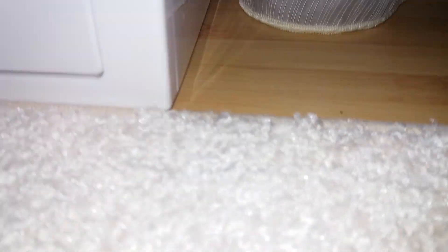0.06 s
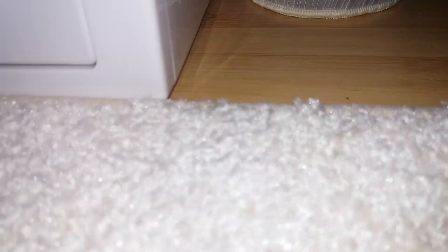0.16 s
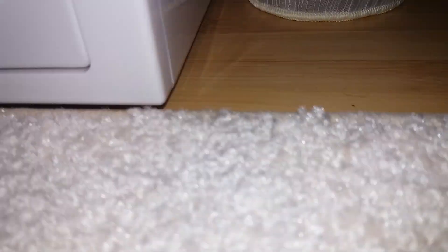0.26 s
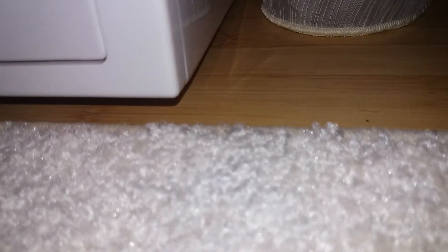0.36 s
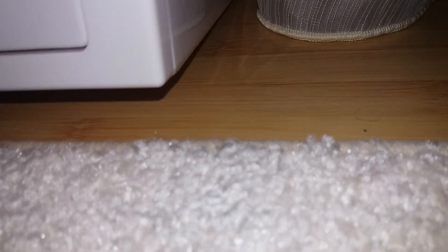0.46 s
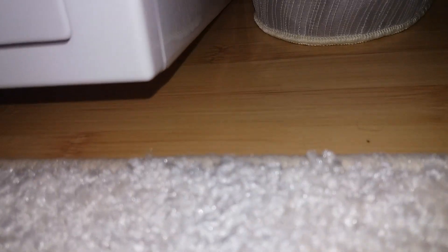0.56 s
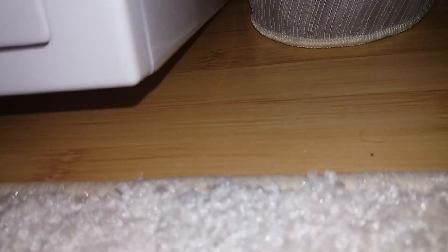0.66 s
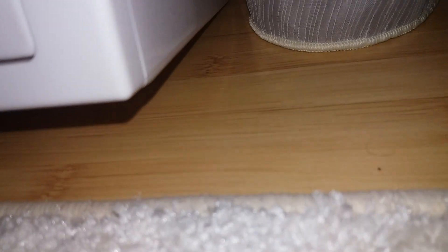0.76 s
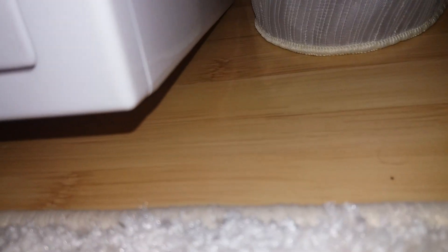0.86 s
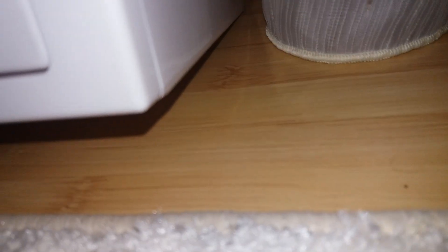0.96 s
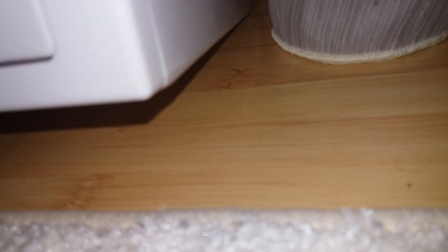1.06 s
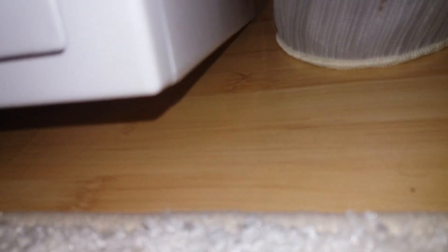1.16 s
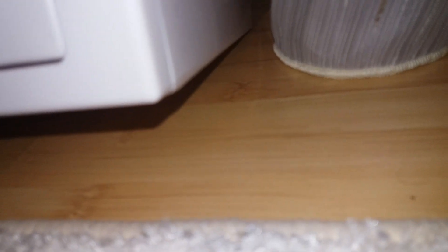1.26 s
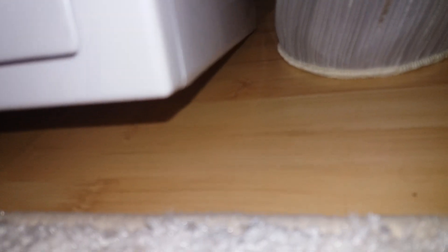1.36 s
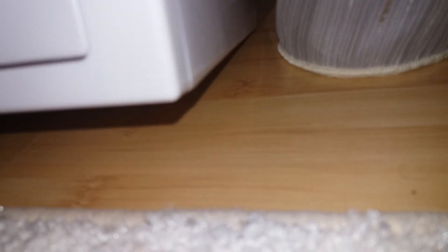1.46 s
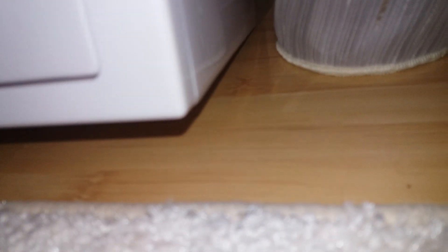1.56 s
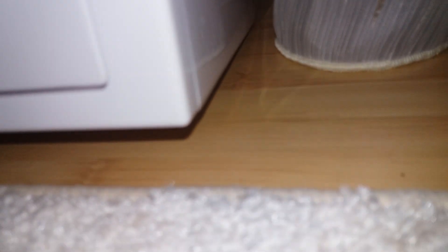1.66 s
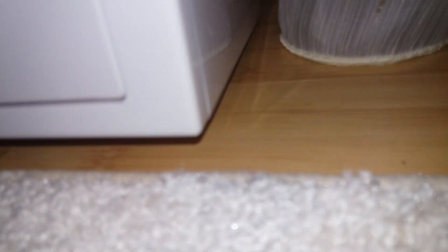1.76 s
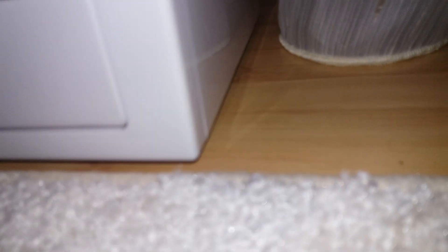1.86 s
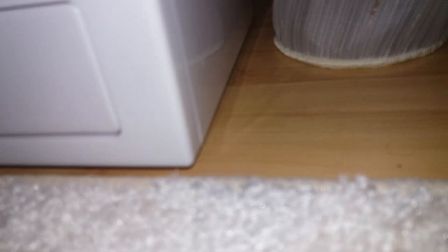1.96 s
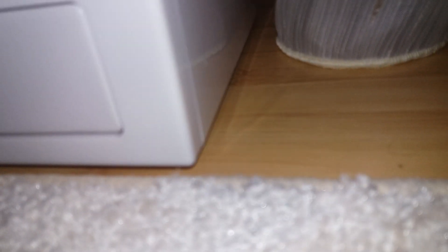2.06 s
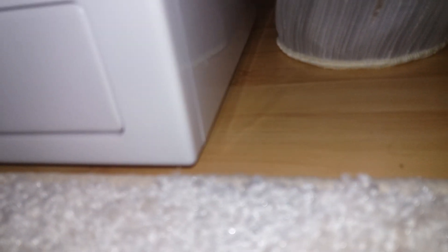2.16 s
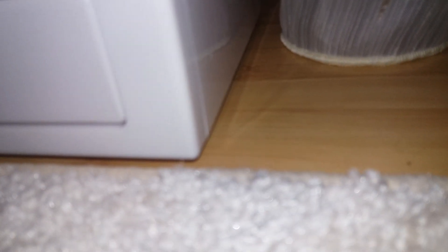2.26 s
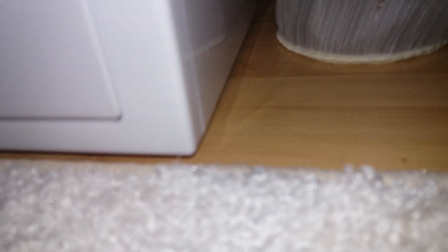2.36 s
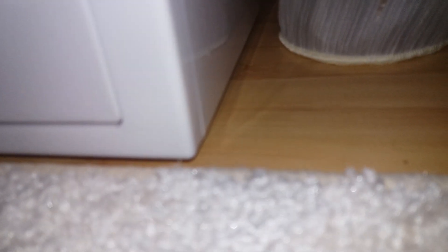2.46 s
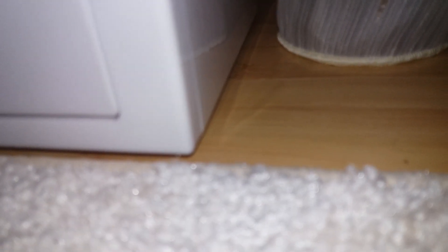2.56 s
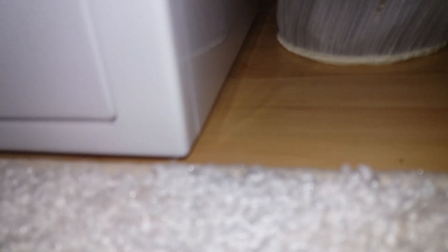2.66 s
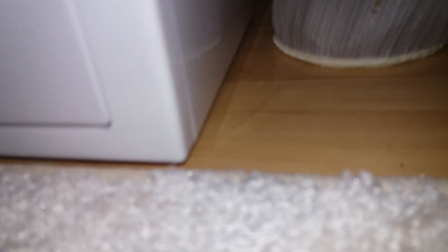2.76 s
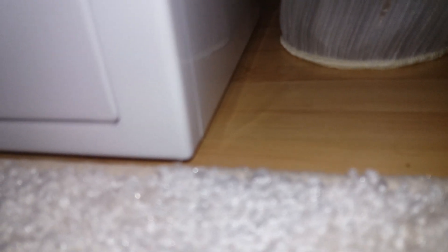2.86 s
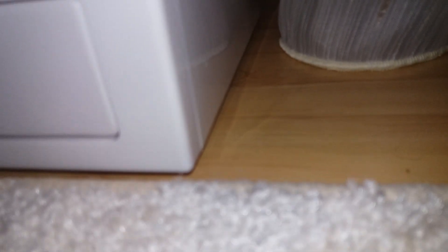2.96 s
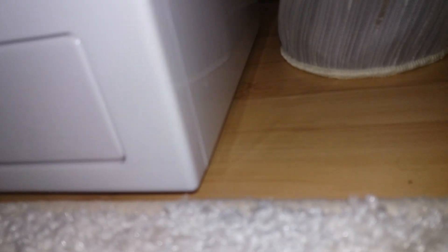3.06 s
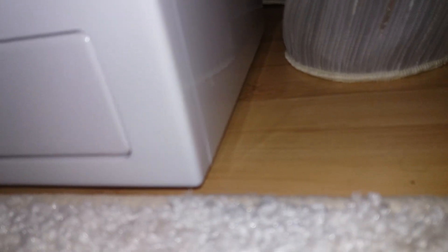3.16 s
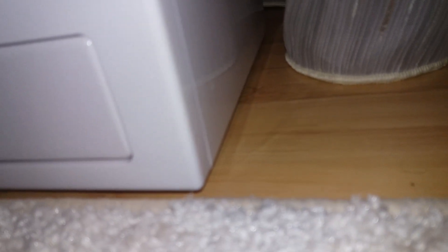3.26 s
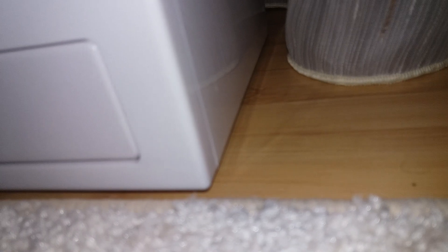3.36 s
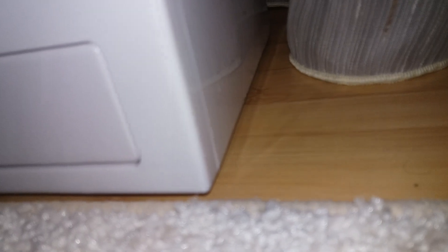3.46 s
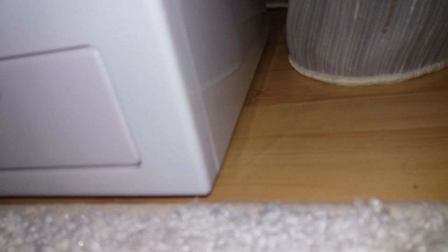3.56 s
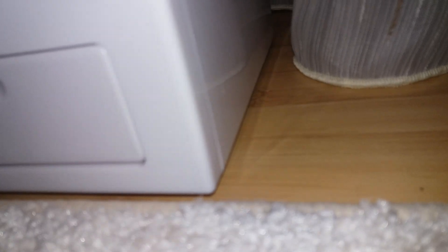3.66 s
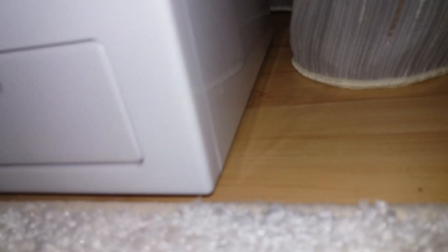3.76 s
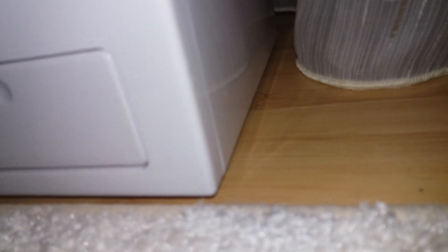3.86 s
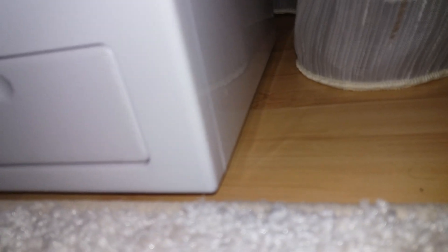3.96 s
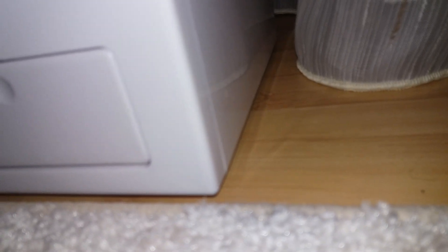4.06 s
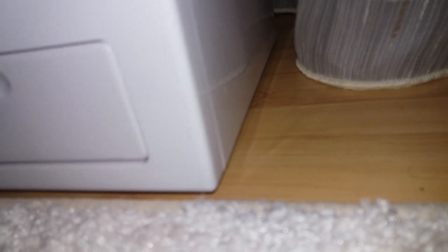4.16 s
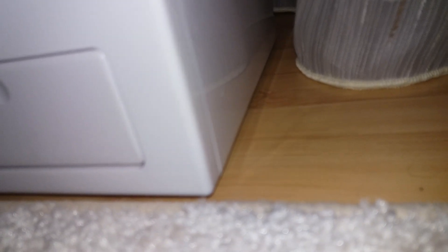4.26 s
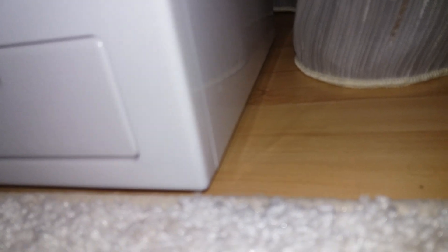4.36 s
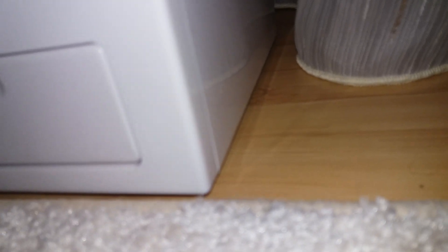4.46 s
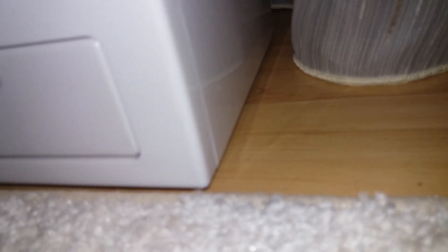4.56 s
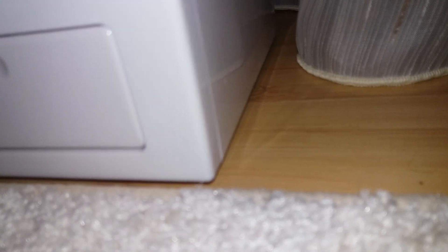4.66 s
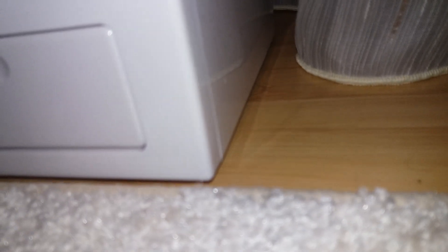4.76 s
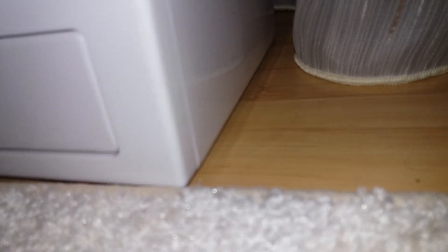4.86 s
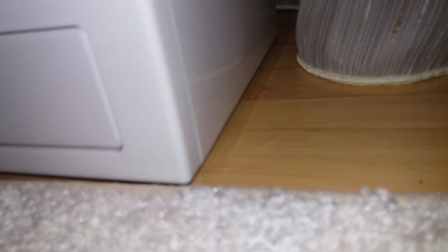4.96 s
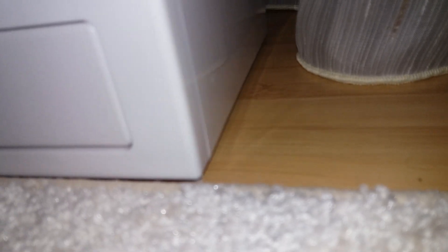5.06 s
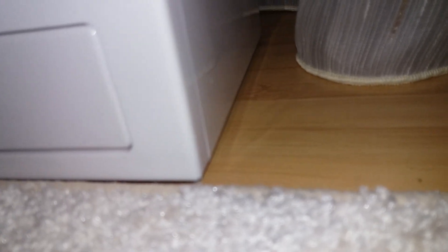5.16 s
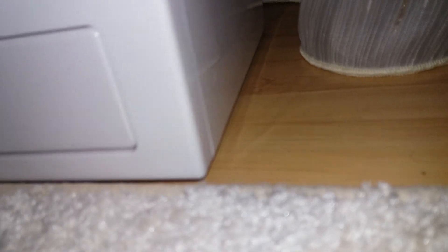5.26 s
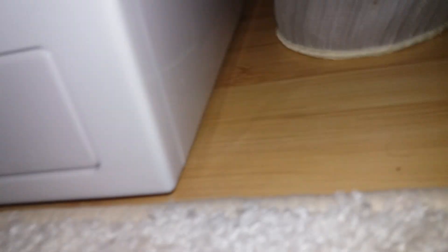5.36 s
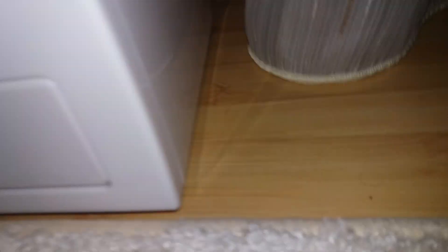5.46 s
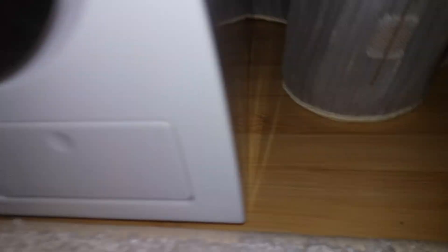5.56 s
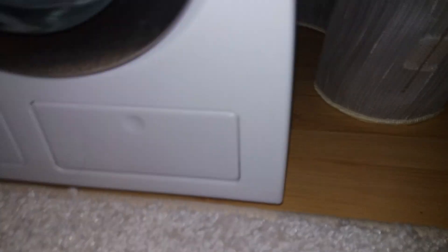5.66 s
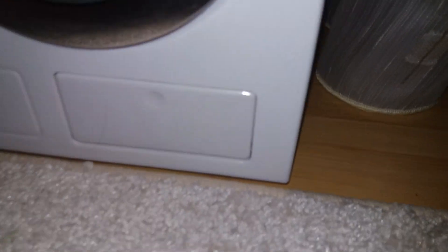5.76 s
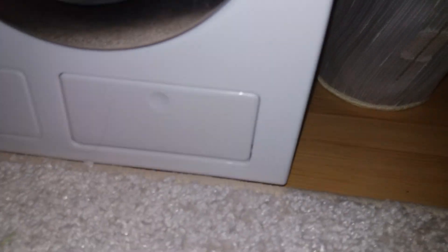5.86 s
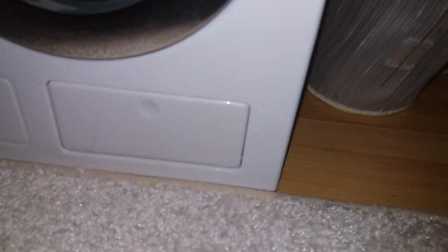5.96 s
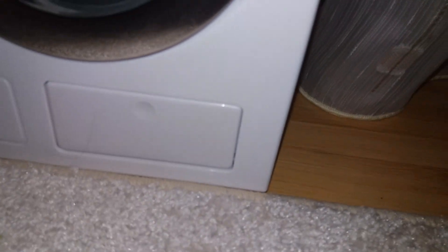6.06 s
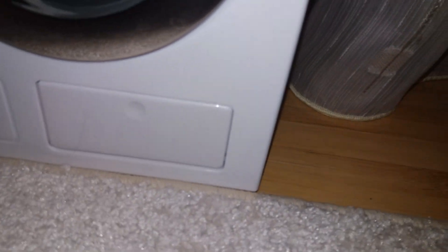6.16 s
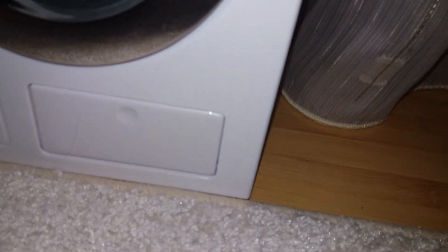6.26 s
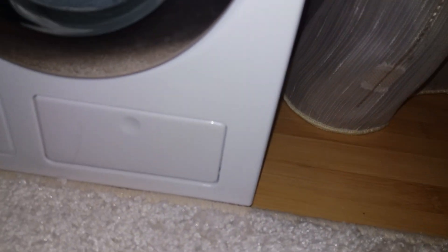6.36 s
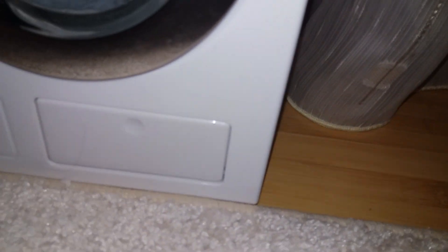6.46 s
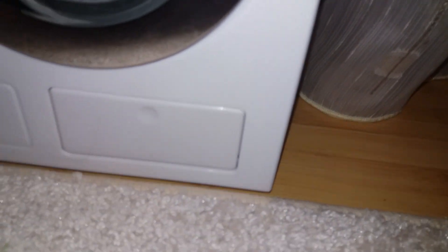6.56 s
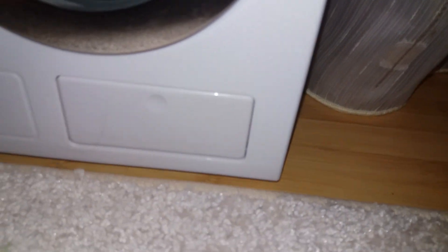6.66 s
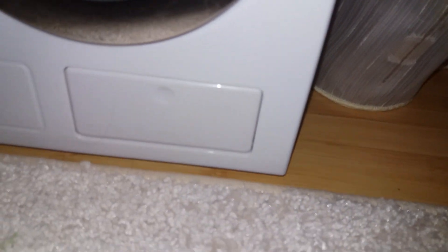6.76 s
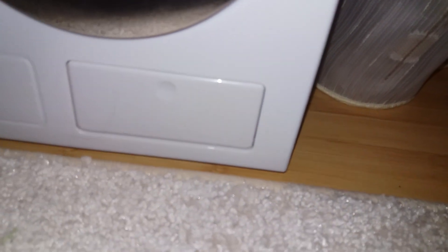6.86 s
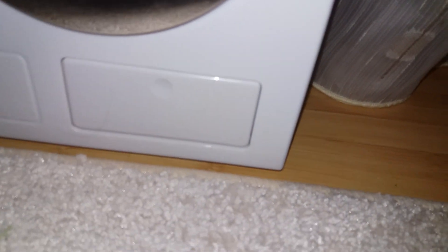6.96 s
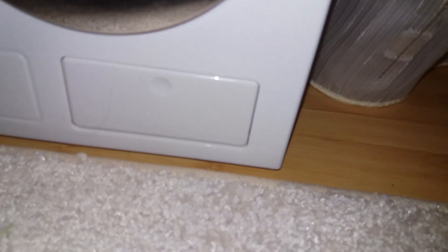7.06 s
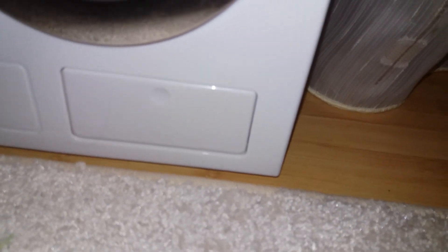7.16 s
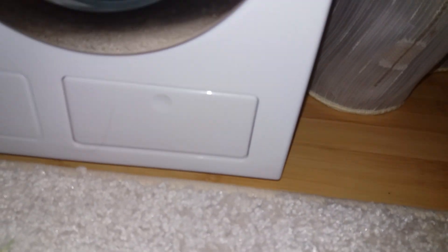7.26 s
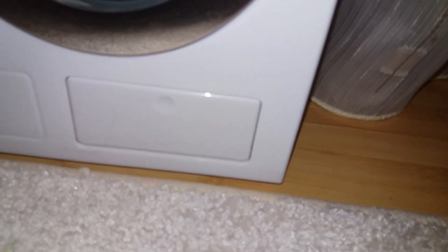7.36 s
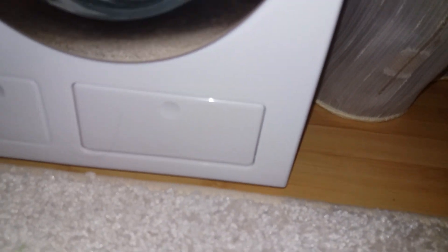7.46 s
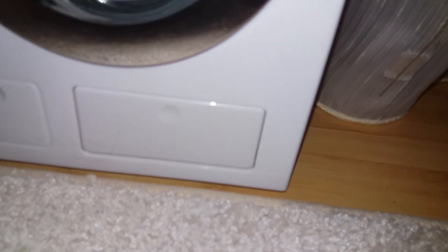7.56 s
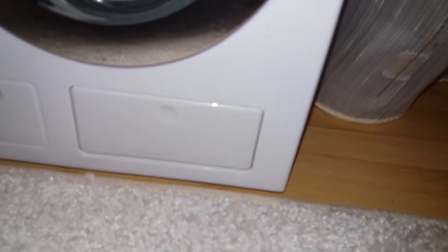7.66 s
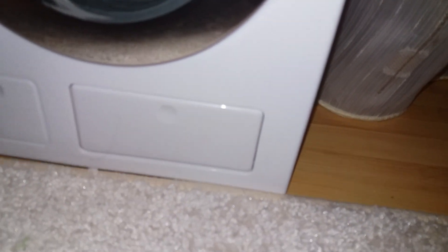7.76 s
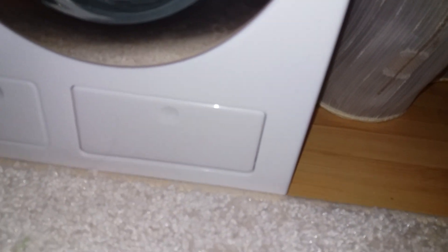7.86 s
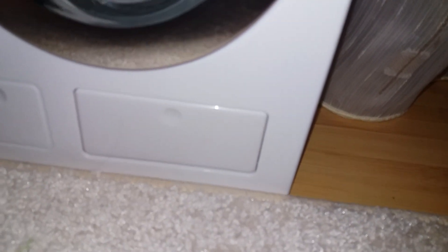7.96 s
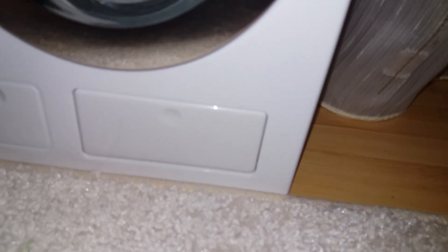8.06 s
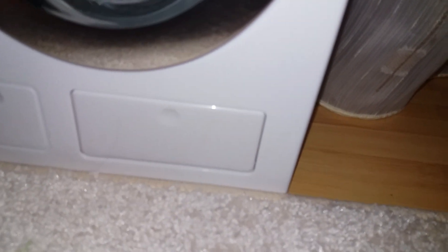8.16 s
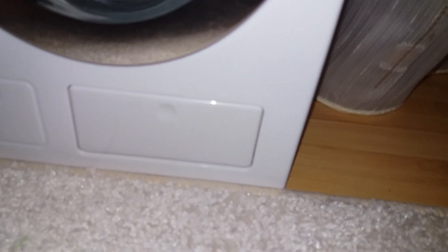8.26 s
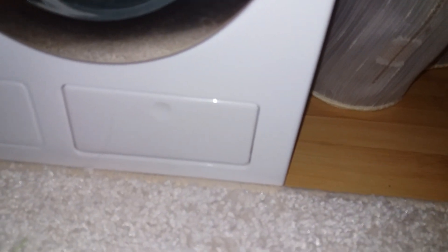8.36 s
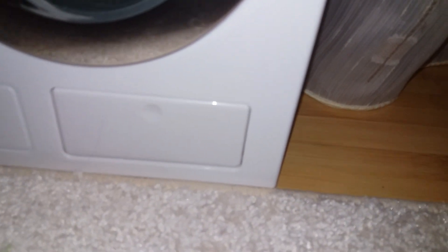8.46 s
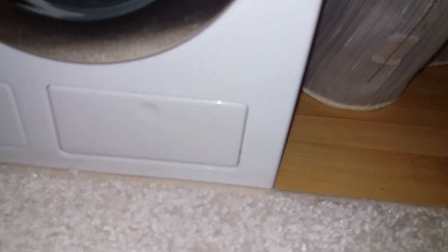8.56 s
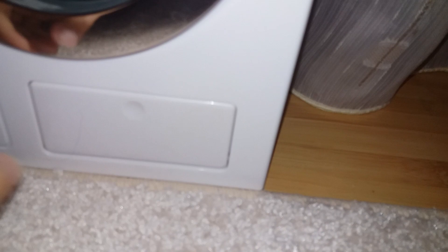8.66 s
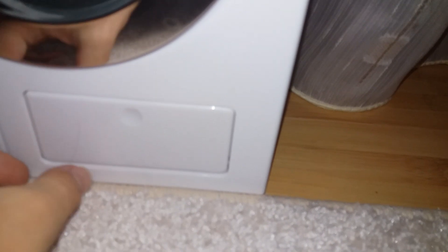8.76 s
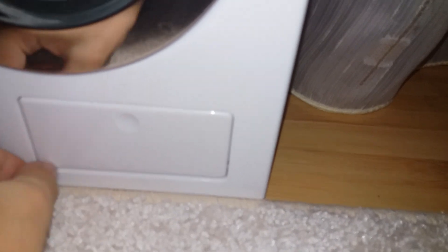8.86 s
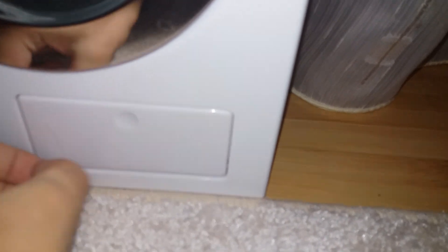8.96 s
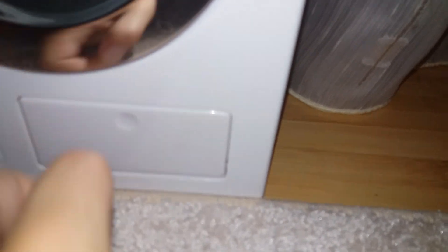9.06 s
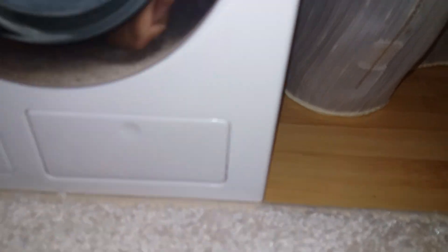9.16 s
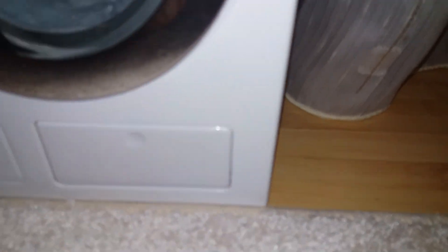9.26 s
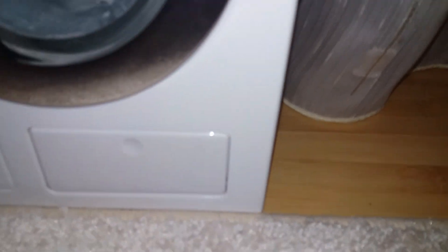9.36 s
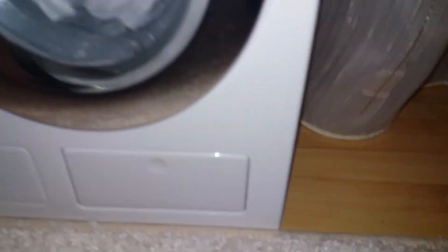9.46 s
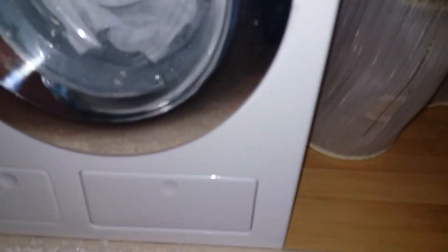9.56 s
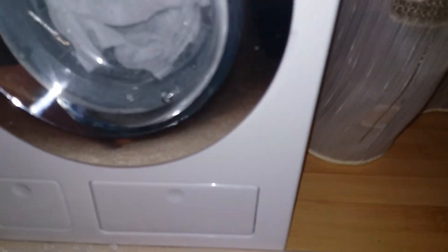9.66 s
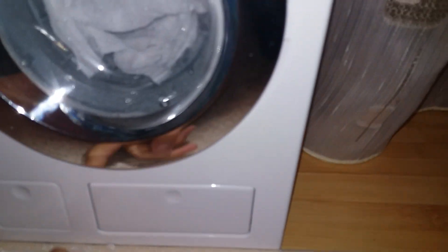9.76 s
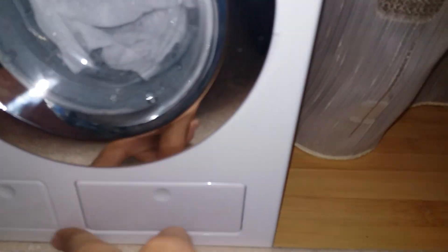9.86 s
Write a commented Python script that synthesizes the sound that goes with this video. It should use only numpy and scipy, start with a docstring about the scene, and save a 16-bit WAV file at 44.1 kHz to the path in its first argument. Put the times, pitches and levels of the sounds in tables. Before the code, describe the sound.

A hollow plastic toy washing machine knocks, clicks and scuffs on a wooden floor, with soft thuds in a quiet room.

```python
"""A plastic toy washing machine is tipped, set down and nudged on a wooden floor in a small quiet room.
Blows ring the modes of its hollow case, loose parts click, and shifting weight thuds in the floor.
The base scuffs in tiny slips that rasp and drum the panels. The boards groan, cloth brushes over
carpet, and a faint low hum wavers under dull room noise."""
import sys
import numpy as np
from scipy import signal
from scipy.fft import rfft, irfft, next_fast_len
from scipy.io import wavfile
from scipy.ndimage import uniform_filter1d

SR = 44100
rng = np.random.default_rng(int(sys.argv[2]) if len(sys.argv) > 2 else 0)


def persist_wave(psi):
    """Save psi, clipped to +-1, as 16-bit WAV."""
    counts = np.round(np.clip(psi, -1, 1) * 32767).astype(np.int16)
    wavfile.write(sys.argv[1], SR, np.atleast_2d(counts).T)


N = 437031
TIME_S = np.arange(N) / SR
AGE_S = TIME_S[:SR * 2 // 5]   # time since a blow

# case modes: (frequency [Hz], level [dB], t60 [s])
CASE_MODES = [(139, -18, 0.094), (195, -3, 0.0958), (225.5, 2.5, 0.13), (239.2, -10, 0.13),
              (352, -10.5, 0.046), (432, -4, 0.065), (506.7, -12.5, 0.076), (574, -14, 0.14),
              (643, -12, 0.053), (852.4, -7, 0.077), (934, -4.5, 0.038), (1084, -11, 0.11),
              (1313, -10.5, 0.055), (1594, -5.5, 0.045), (1724, -3, 0.016), (1868, -4, 0.043),
              (2154, 5, 0.012), (2495, -4.5, 0.039), (2663, -14.5, 0.069), (2902, -8, 0.017),
              (3210, -15.5, 0.018), (3520, -18.5, .025), (3760, -19.5, 0.031), (4280, -15, 0.022)]
# boom, body, clack and tick bands: (low [Hz], high [Hz])
BANDS_HZ = [(110, 300), (300, 1200), (1200, 3500), (3500, 13000)]


def amp(db):
    """Decibels to gain."""
    return 10 ** (np.asarray(db) / 20)


def unit_rms(x):
    """Scale to rms 1."""
    return x / np.sqrt(np.mean(x ** 2) + 1e-20)


def at_hz(points, hz):
    """Interpolate a table over log frequency."""
    known_hz, value = np.transpose(points)
    return np.interp(np.log(np.maximum(hz, 1)), np.log(known_hz), value)


def coloured(x, spectrum):
    """Shape by (frequency [Hz], gain [dB]); rms 1."""
    size = next_fast_len(len(x))
    gain = amp(at_hz(spectrum, np.fft.rfftfreq(size, 1 / SR)))
    return unit_rms(irfft(rfft(x, size) * gain, size)[:len(x)])


def band(x, low_hz, high_hz, order=2):
    """Causal band-pass."""
    sos = signal.butter(order, [low_hz, high_hz], "band", fs=SR, output="sos")
    return signal.sosfilt(sos, x + 1e-18)


def low_pass(x, hz, order=2):
    """Causal low-pass."""
    return signal.sosfilt(signal.butter(order, min(hz, SR * 0.45), fs=SR, output="sos"), x)


def resonate(x, hz, width_hz):
    """One resonance, unit peak gain."""
    r = np.exp(-np.pi * width_hz / SR)
    feedback = [1, -2 * r * np.cos(2 * np.pi * hz / SR), r * r]
    return signal.lfilter(np.array([1, 0, -1]) * (1 - r * r) / 2, feedback, x)


def decay(t60_s):
    """Envelope falling 60 dB in t60_s."""
    return np.exp(-np.log(1000) * AGE_S / t60_s)


def add(out, time_s, sound):
    """Mix a sound in at time_s."""
    start = max(round(time_s * SR), 0)
    out[start:start + len(sound)] += sound[:max(len(out) - start, 0)]


def strokes(rows, edge_db=-16):
    """Envelope of strokes that swell and fade, linear in dB."""
    gain = 0
    for peak_s, length_s, db in rows:
        away = np.abs(TIME_S - peak_s) / (length_s / 2)
        gain = np.maximum(gain, amp(db + edge_db * np.minimum(away, 10)))
    return gain


def air(room_db=-65, hiss_db=-87):
    """Dull room noise and even microphone hiss."""
    # still air: (frequency [Hz], gain [dB])
    spectrum = [(25, -31.5), (50, -7.5), (85, -3.5), (120, -5.5), (165, -1), (280, -8.5), (450, -11),
                (700, -14), (1200, -20), (2400, -23), (3500, -27), (5500, -34.5), (9000, -37.5),
                (15500, -36)]
    room_noise = coloured(rng.standard_normal(N), spectrum)
    return amp(room_db) * room_noise + amp(hiss_db) * rng.standard_normal(N)


def hum_and_groans(hz=89.5, width_hz=39):
    """A wavering narrow-band hum; the boards groan in the same band as weight shifts."""
    # hum: (time [s], level [dB])
    hum_levels = [(0, -67), (1, -87), (2.6, -74.5), (3.8, -70.5), (6, -72), (7, -80), (8.1, -71.5),
                  (8.7, -85), (9.9, -78)]
    # board groans: (peak time [s], length [s], level [dB])
    groans = [(1.35, 0.23, -46.5), (1.55, 0.34, -51), (1.85, 0.61, -60), (6.49, 0.3, -55)]
    noise = rng.standard_normal(N + SR)
    drone = resonate(resonate(noise, hz, width_hz), hz, width_hz)[SR:]
    drone /= np.sqrt(uniform_filter1d(drone ** 2, size=SR // 8) + 1e-20)
    hum_gain = amp(np.interp(TIME_S, *np.transpose(hum_levels)))
    return np.hypot(hum_gain, strokes(groans)) * drone


def cloth():
    """Cloth on carpet: fibre contacts merge into a soft hiss."""
    # brush strokes: (peak time [s], length [s], level [dB])
    brushes = [(0.05, 0.32, -65.5), (0.18, 0.58, -65.5), (0.87, 1, -64), (5.53, 0.75, -71.5), (5.8, 1, -69)]
    # fibre hiss: (frequency [Hz], gain [dB])
    spectrum = [(500, -18.5), (1500, 12.5), (3000, 10), (5500, -5.5), (7000, -7), (9000, -20),
                (15000, -25.5)]
    return strokes(brushes) * coloured(rng.standard_normal(N), spectrum)


def floor_thuds(push_t60_s=0.065, rise_s=0.0036, trim_db=4, boards_db=-19, boards_t60_s=0.53):
    """Weight shifts on the floor: a push of a few cycles, then the boards rumble on."""
    # thuds: (time [s], relative level [dB], pitch [Hz])
    thuds = [(1.212, -26, 137), (1.25, -38.5, 104), (1.999, -32, 61.1), (3.185, -44, 147), (3.509, -46, 90),
             (3.589, -42, 80), (5.212, -42.5, 70), (6.012, -39.5, 72), (6.143, -44, 79.4),
             (6.401, -43, 103), (6.556, -31.5, 161), (7.896, -42, 146), (8.362, -40, 85)]
    out = np.zeros(N)
    attack = 1 - np.exp(-AGE_S / rise_s)
    for time_s, db, hz in thuds:
        rumble = unit_rms(band(rng.standard_normal(len(AGE_S)), hz * 0.88, hz * 1.63))
        boards = amp(boards_db) * rumble * decay(boards_t60_s)
        push = np.sin(2 * np.pi * hz * AGE_S) * decay(push_t60_s)
        add(out, time_s, amp(db + trim_db) * (push + boards) * attack)
    return band(out, 55, 1500, order=3)


def base_scuffs(slips_per_s=3000, uneven_db=2.5, ring_db=-1, drum_trim_db=-2, rasp_trim_db=-1.5):
    """Dense tiny slips rasp under the base and set the panels drumming."""
    # pushes: (peak time [s], length [s], relative drumming [dB], relative rasp [dB])
    pushes = [(1.826, 0.67, -66, -60.5), (1.977, 0.1, -47.5, -58.5), (3.24, 0.22, -42.5, -59.5),
              (3.423, 0.031, -34.5, -71), (3.493, 0.14, -37, -55.5), (3.667, 0.61, -53.5, -69),
              (3.866, 0.22, -65, -67), (4.004, 0.088, -56, -80), (4.355, 0.23, -49.5, -76),
              (4.978, 0.19, -46.5, -58), (5.175, 0.13, -42, -52), (5.47, 0.071, -57.5, -52),
              (6.039, 0.31, -54, -73), (6.244, 0.32, -65, -65), (6.323, 0.091, -63, -58),
              (6.373, 0.43, -54, -62), (6.592, 0.31, -51.5, -63.5), (6.69, 0.22, -46, -60),
              (6.743, 0.15, -52, -61), (7.896, 0.3, -54, -70), (8.374, 0.12, -42.5, -58.5),
              (8.502, .25, -63, -68), (9.156, 0.21, -83, -62.5), (9.289, .26, -87.5, -57.5)]
    # panel drumming: (frequency [Hz], gain [dB])
    drum_spectrum = [(50, -21), (100, -6), (170, 6), (230, 6.5), (310, -15.5), (450, -7), (700, -21),
                     (1200, -31.5), (3000, -75)]
    # base rasp: (frequency [Hz], gain [dB])
    rasp_spectrum = [(200, -17), (500, 2.5), (900, 6), (1400, 3.5), (2300, 2.5), (3500, 0), (4800, -6),
                     (6500, -20), (9000, -23.5), (15000, -32)]
    peak_s, length_s, drum_db, rasp_db = np.transpose(pushes)
    drum_gain = strokes(zip(peak_s, length_s, drum_db + drum_trim_db))
    rasp_gain = strokes(zip(peak_s, length_s, rasp_db + rasp_trim_db))
    slips = (rng.random(N) < slips_per_s / SR) * rng.choice([-1, 1], N)
    slips = slips * amp(uneven_db * np.minimum(rng.exponential(1, N), 4))
    ring = sum((-1) ** k * resonate(slips, hz, np.log(1000) / np.pi / t60_s)
               for k, (hz, _, t60_s) in enumerate(CASE_MODES))
    friction = slips + amp(ring_db) * ring
    return drum_gain * coloured(friction, drum_spectrum) + rasp_gain * coloured(friction, rasp_spectrum)


def room_tail(count, onset_s=0.01):
    """Diffuse sound builds up, then decays at its own rate in each octave."""
    # reverberation: (frequency [Hz], t60 [s])
    reverb_times = [(80, .4), (220, .36), (500, .27), (1200, .24), (3000, .25), (6000, .29), (14000, .14)]
    noise = rng.standard_normal((count, len(AGE_S)))
    edges_hz = np.geomspace(60, 15360, 9)
    tail = sum((-1) ** k * band(noise, low, high) * decay(at_hz(reverb_times, np.sqrt(low * high)))
               for k, (low, high) in enumerate(zip(edges_hz, edges_hz[1:])))
    return tail * (1 - np.exp(-AGE_S / onset_s))


def room_responses(count, tail_trim_db=-26.5, echo_s=0.025, echo_db=-7, echo_hz=600):
    """Direct sound, a dull ceiling echo and a different diffuse tail per blow."""
    direct = signal.unit_impulse(len(AGE_S))
    early = direct.copy()
    add(early, echo_s, amp(echo_db) * low_pass(direct, echo_hz, order=1))
    return early + amp(tail_trim_db) * room_tail(count) / np.sqrt(SR / 1000)


def standing_waves():
    """Energy seeps from the case into low room modes, which swell and fade."""
    # room modes: (frequency [Hz], peak level [dB], t60 of the decay factor [s])
    room_modes = [(164, -38, 0.1484), (235.4, -23.5, 0.25), (239.1, -28, 0.18)]
    out = 0
    for hz, db, t60_s in room_modes:
        swell = AGE_S ** 2 * decay(t60_s)
        out = out + amp(db) * swell / swell.max() * np.sin(2 * np.pi * hz * AGE_S)
    return out


def contacts():
    """Hard knocks, plus soft bumps of one dull colour as the case rocks on its base."""
    # knocks, relative levels: (time [s], boom [dB], body [dB], clack [dB], tick [dB],
    # struck part [Hz], its boost [dB], rattle [dB])
    knocks = [(0.032, -45.5, -51, -58.5, -63, 586, 16, 10), (0.115, -67, -54, -52, -58, 2060, 15, -11),
              (0.152, -82, -53, -53, -50, 3560, 4, 0), (0.302, -73, -52.5, -54.5, -58, 666, 11, 2),
              (0.432, -62, -49.5, -51, -56, 3150, 9.5, 0.5), (0.771, -87, -59.5, -53.5, -59.5, 1860, 11, 3),
              (1.246, -48, -59.5, -54.5, -64, 2630, 18.5, 5), (1.601, -43, -42, -56, -75, 435, 7.5, -6),
              (1.784, -67.5, -59, -46, -68, 2670, 11.5, -5), (1.809, -63.5, -66, -54, -72.5, 2660, 15, -12),
              (1.9965, -15.5, -27, -26, -39.5, 1610, 5.5, -7), (2.008, -36.5, -36.5, -39.5, -51, 447, 5, 4),
              (2.737, -46, -52, -61, -71, 621, 13, -3), (3.094, -44.5, -41.5, -43.5, -52, 677, 9, -7.5),
              (3.224, -61, -48.5, -52.5, -70, 2170, 1, 2), (3.246, -61, -54, -56.5, -70, 1360, 12, -11),
              (3.403, -45, -49, -45, -55, 2550, 3, 5), (3.495, -38.5, -52, -71, -88, 520, 8, -3),
              (3.523, -60, -47.5, -49.5, -84, 864, 3, -9), (3.586, -41, -44.5, -49.5, -70, 533, 8.5, -9),
              (4.19, -65, -61.5, -66, -84, 2710, 8, -9), (4.326, -46.5, -49.5, -60, -68, 607, 14, 8),
              (4.698, -45.5, -49, -59, -82.5, 531, 14.5, -11.5),
              (5.165, -40.5, -57, -61.5, -71, 1930, 2, 5), (6.1415, -25.5, -39.5, -44, -60.5, 416, 8, -22),
              (6.150, -50, -42.5, -54, -64, 950, 4, -1), (6.287, -66, -54, -55, -71, 730, 26, -5),
              (6.366, -46.5, -63, -64.5, -76, 730, 5, -15), (6.43, -71, -68, -67, -75, 1280, 16, -7),
              (6.551, -54.5, -59.5, -64.5, -73, 1530, 11, -2), (7.894, -43, -56, -67, -81, 1390, 4, 0),
              (8.314, -54, -70, -72.5, -78, 1150, 14, -5.5), (8.358, -40, -52, -74, -72, 494, 5, 1),
              (8.905, -76, -63.5, -70.5, -83.5, 1590, 1.5, -7),
              (8.949, -73, -47.5, -46, -55, 2260, 11.5, 2),
              (9.165, -89, -76, -55.5, -55.5, 4180, -1.5, -12.5)]
    # bumps: (time [s], relative boom [dB])
    bumps = [(0.447, -36.5), (2.572, -54.5), (4.151, -51.5), (4.293, -48.5), (4.39, -42), (4.708, -37.5),
             (5.209, -42), (6.018, -47.5), (6.598, -48), (8.048, -56), (8.385, -41)]
    return knocks + [(time_s, db, db - 24, db - 40.5, db - 45.5, 480, 6.5, 4) for time_s, db in bumps]


def case_rings(hits, vary_db=4, snap_db=2, snap_t60_s=0.018, rattle_t60_s=0.078):
    """Per blow: case modes at varied strengths, a contact snap and a short rattle."""
    # contact crack and dense small modes: (frequency [Hz], gain [dB])
    crack_spectrum = [(100, 2), (220, -3.5), (320, -5.5), (450, 8), (900, -2), (1400, -1.5), (2200, 3),
                      (3300, -3), (4300, -10), (5500, -17), (8000, -26), (15000, -43.5)]
    hz, level_db, t60_s = np.transpose(CASE_MODES)
    # panels swing together in the bass; higher modes alternate in sign
    polarity = np.where(hz > BANDS_HZ[0][1], (-1) ** np.arange(len(hz)), 1)
    modes = np.sin(2 * np.pi * hz[:, None] * AGE_S) * decay(t60_s[:, None])
    strength = polarity * amp(level_db + vary_db * rng.standard_normal((len(hits), len(hz))))
    noise = coloured(rng.standard_normal(len(hits) * len(AGE_S)), crack_spectrum)
    crack = band(noise, 440, 11000).reshape(len(hits), -1)
    snap = amp(snap_db) * decay(snap_t60_s)
    rattle = amp(np.array(hits)[:, -1:]) * decay(rattle_t60_s)
    return strength @ modes + crack * (snap + rattle)


def case_knocks(trims_db=(-2.5, 1, 0, 0), part_q=9, contact_hz=7700, ref_db=-51.5, db_per_octave=42.5):
    """Place and hardness of each contact set how much the case booms, clacks and ticks."""
    hits = contacts()
    blows = signal.fftconvolve(case_rings(hits), room_responses(len(hits)), axes=1)
    blows = blows[:, :len(AGE_S)] + standing_waves()
    for blow, (_, boom_db, *_, part_hz, part_db, _) in zip(blows, hits):
        struck_part = (amp(part_db) - 1) * resonate(blow, part_hz, part_hz / part_q)
        # heavier blow: longer contact, duller sound
        cutoff_hz = contact_hz * 2 ** ((ref_db - boom_db) / db_per_octave)
        blow[:] = low_pass(blow + struck_part, cutoff_hz)
    out = np.zeros(N)
    for k, (edges_hz, trim_db) in enumerate(zip(BANDS_HZ, trims_db)):
        # boom inverted to join the body without a notch
        banded = band(blows, *edges_hz, order=3) if k else -band(blows, *edges_hz)
        for blow, (time_s, *levels_db, _, _, _) in zip(banded, hits):
            onset_rms = np.std(blow[:SR // 40])
            add(out, time_s, amp(levels_db[k] + trim_db) * blow / onset_rms)
    return out


def scene():
    """Mono mix, heard close to the floor."""
    return (case_knocks() + floor_thuds() + base_scuffs() + cloth() + hum_and_groans() + air())[None]


def record(dry):
    """Steep treble cut and a slight DC offset."""
    cutoff_hz, offset = 15900, -0.0005
    return signal.sosfilt(signal.ellip(10, 0.1, 80, cutoff_hz, fs=SR, output="sos"), dry) + offset


dry = scene()
out = record(dry)
persist_wave(out)
```